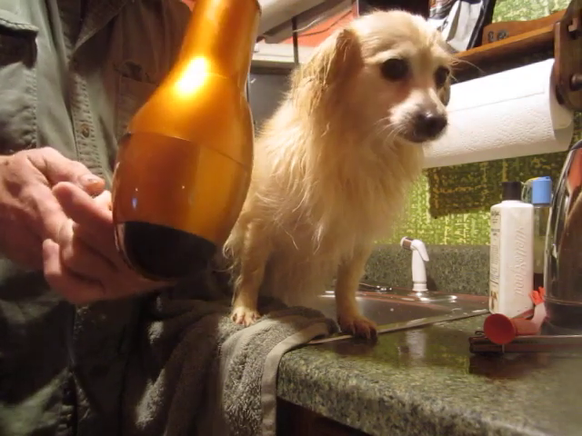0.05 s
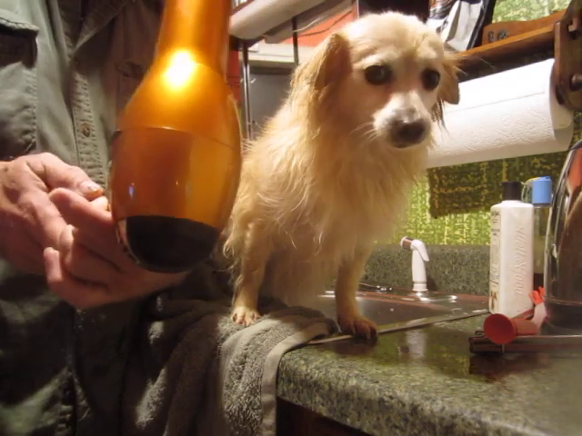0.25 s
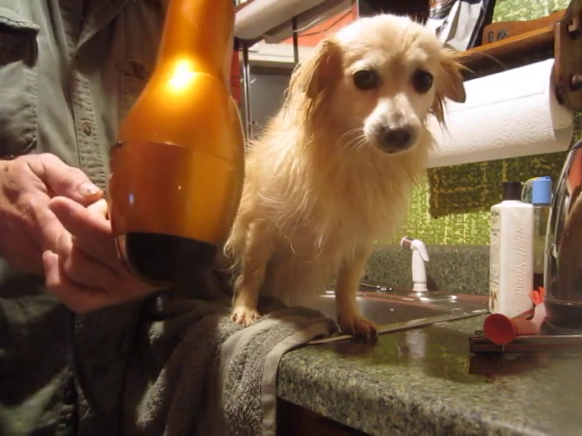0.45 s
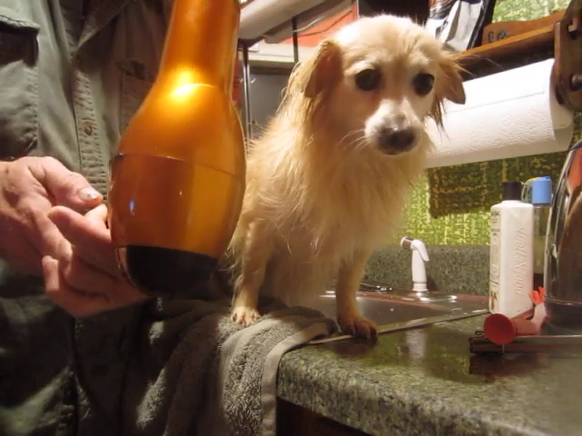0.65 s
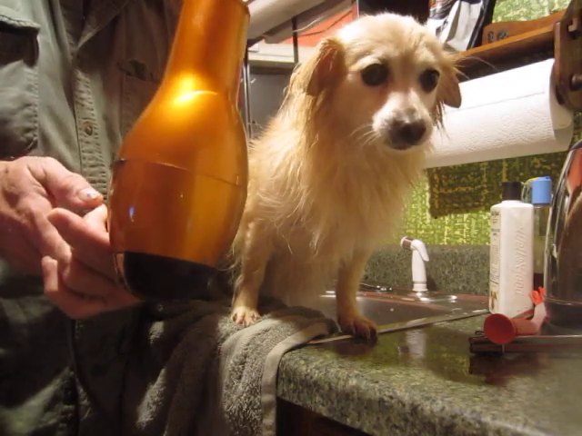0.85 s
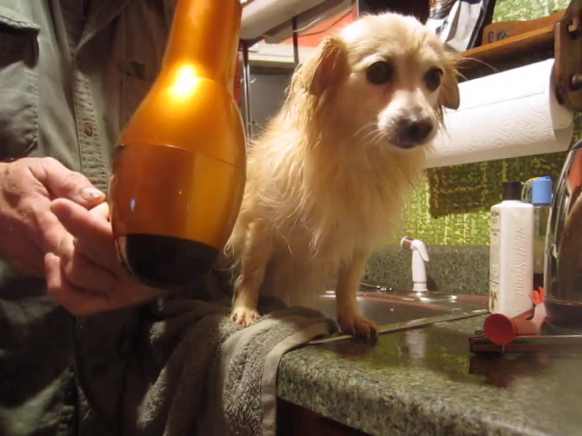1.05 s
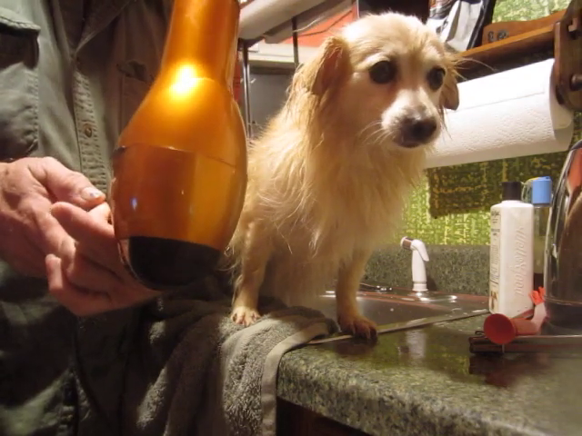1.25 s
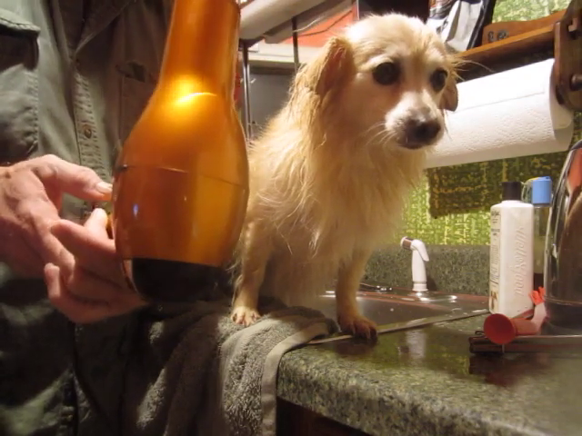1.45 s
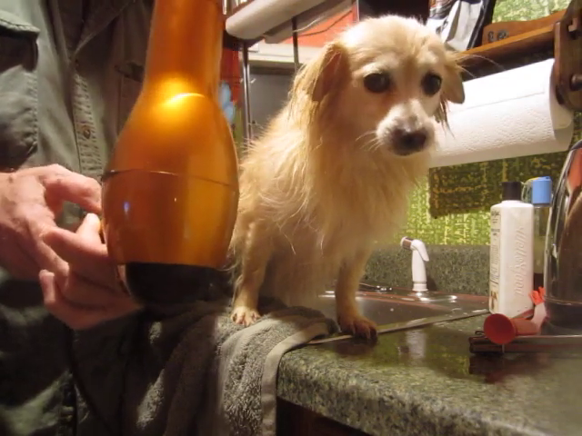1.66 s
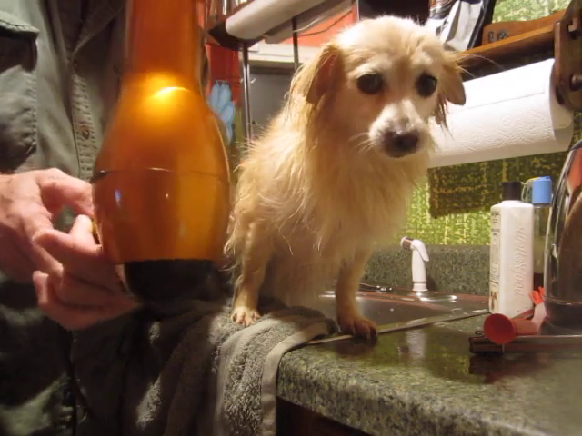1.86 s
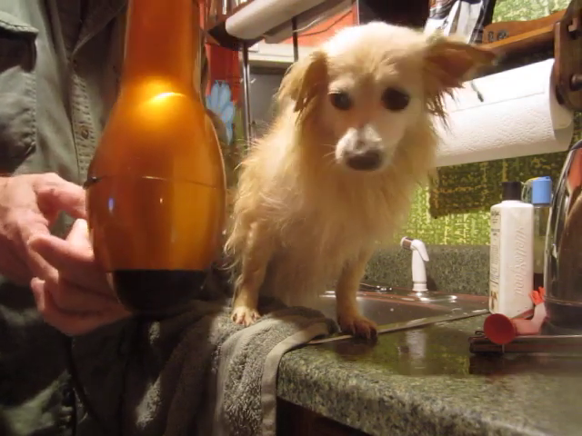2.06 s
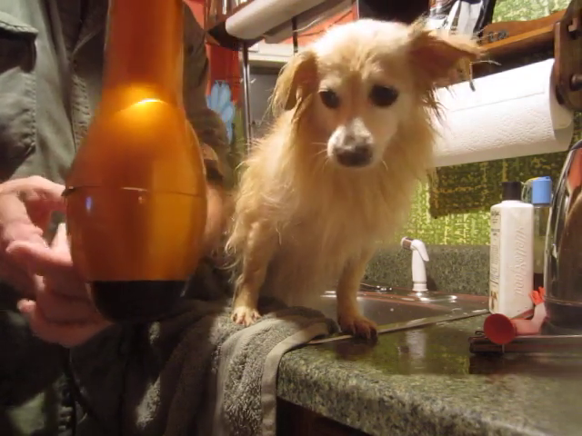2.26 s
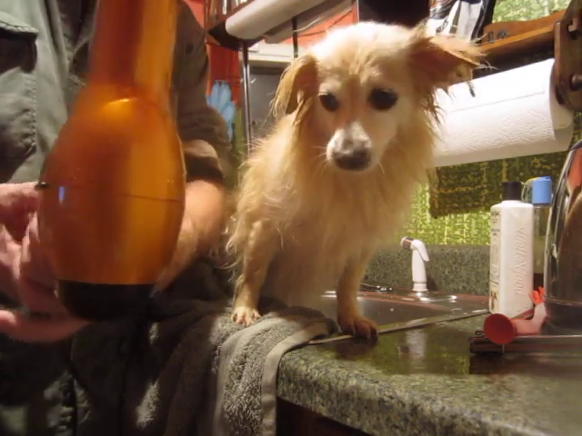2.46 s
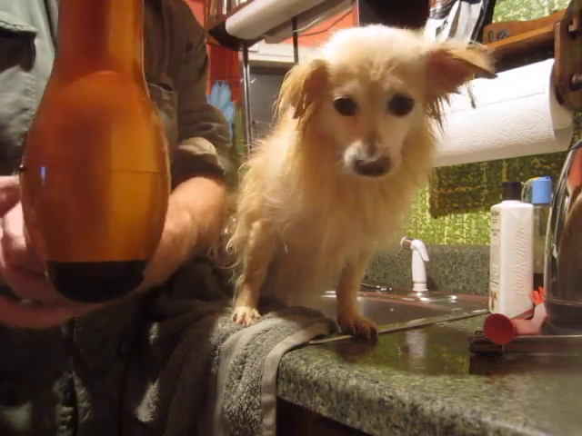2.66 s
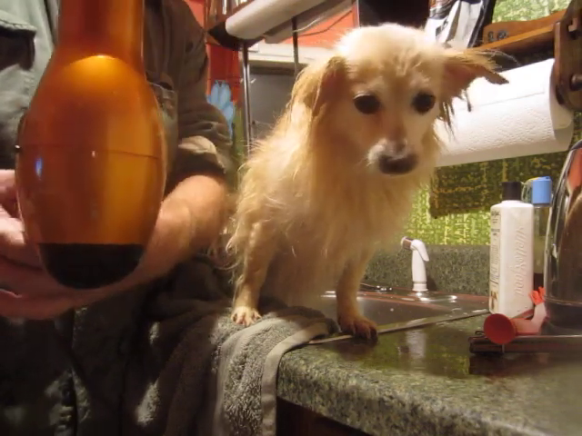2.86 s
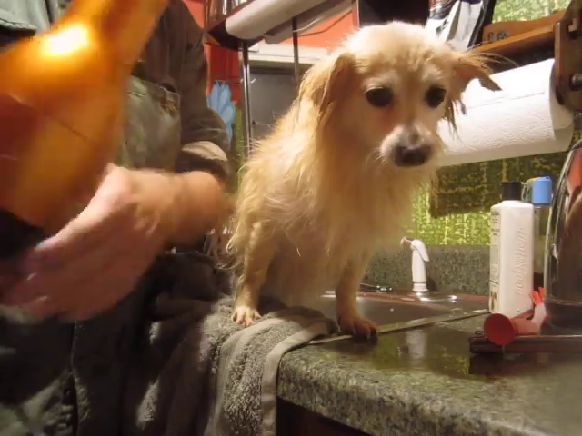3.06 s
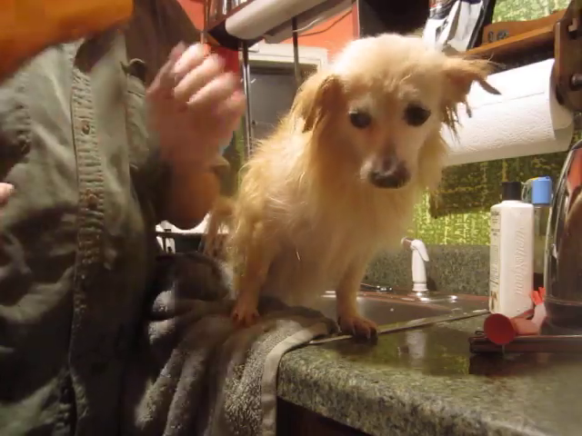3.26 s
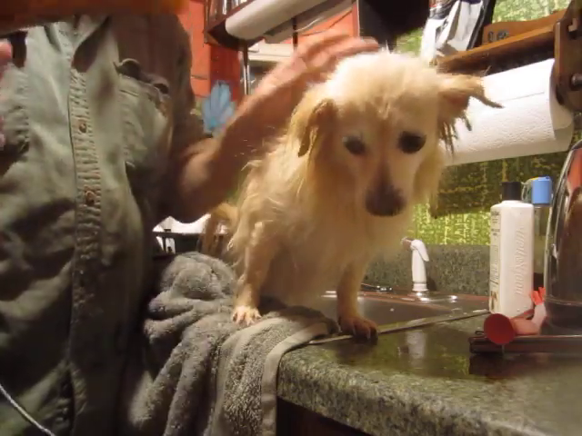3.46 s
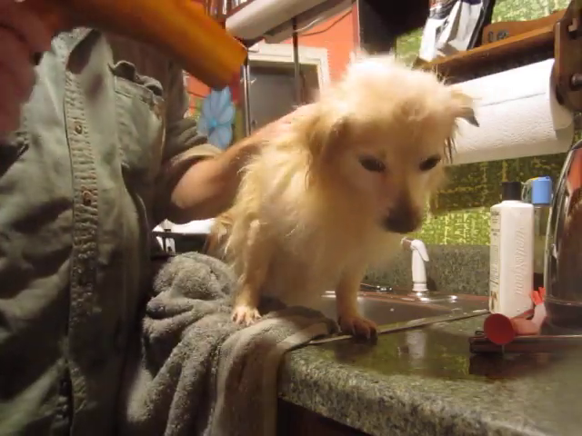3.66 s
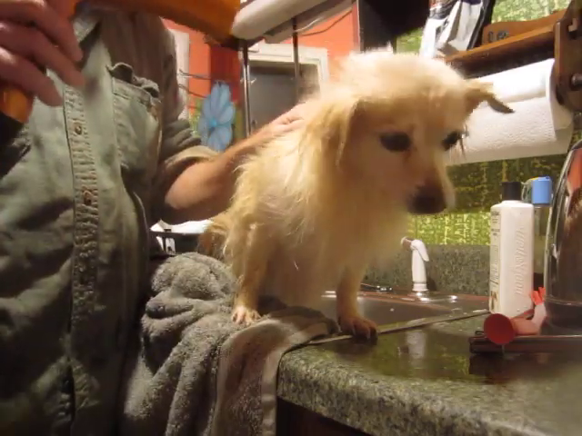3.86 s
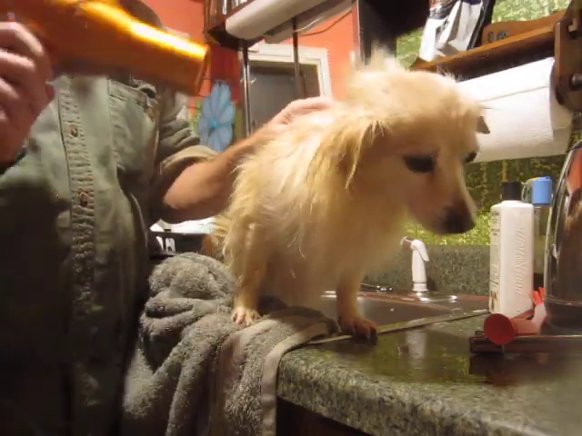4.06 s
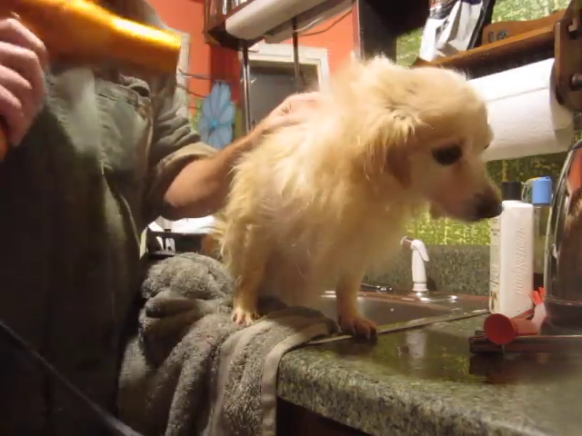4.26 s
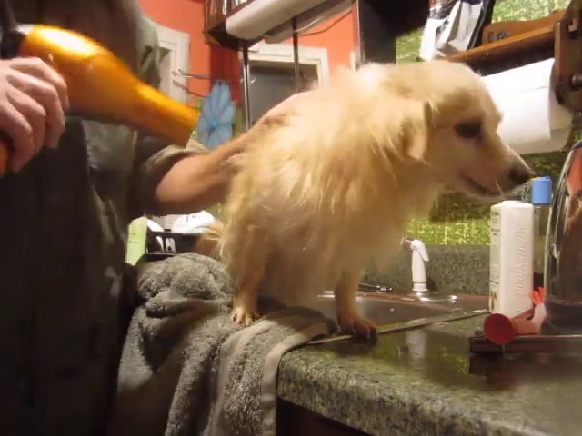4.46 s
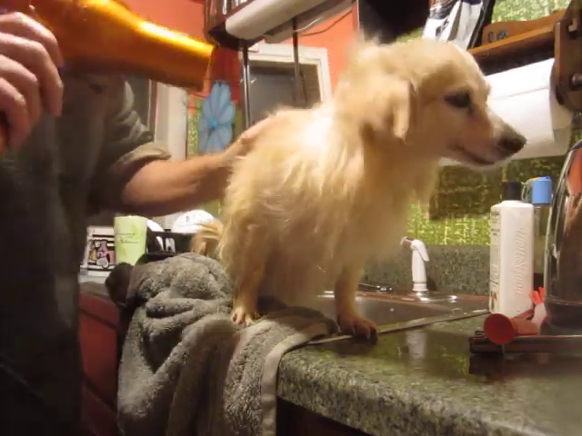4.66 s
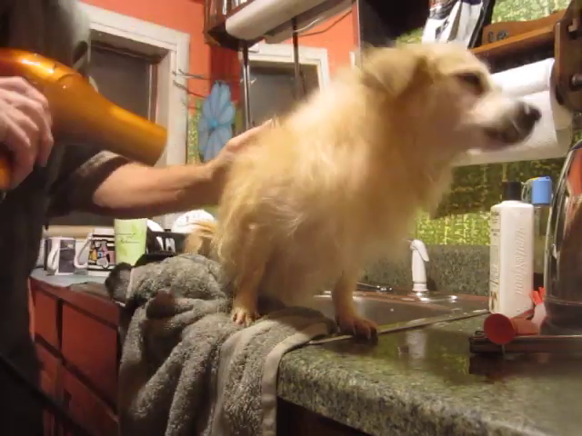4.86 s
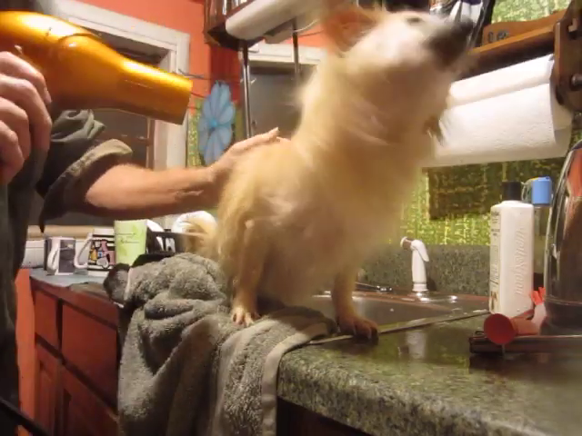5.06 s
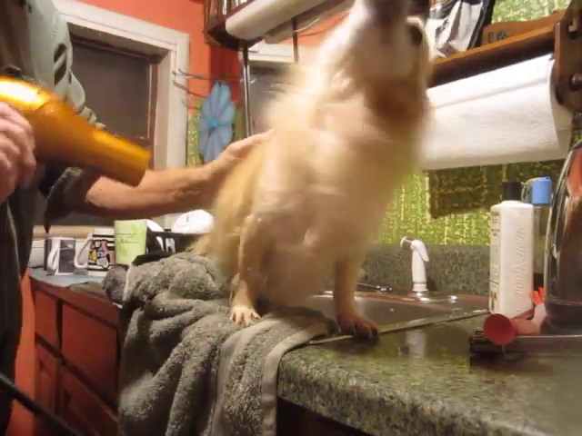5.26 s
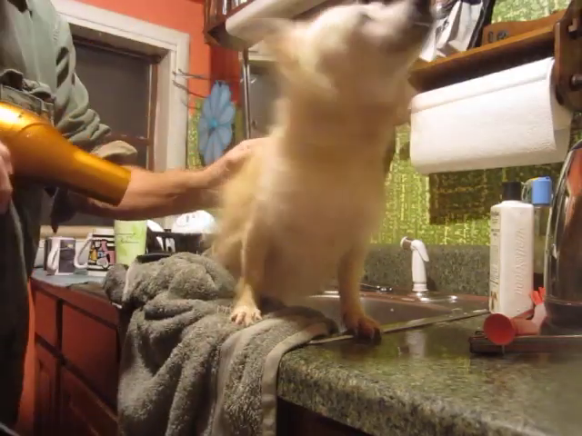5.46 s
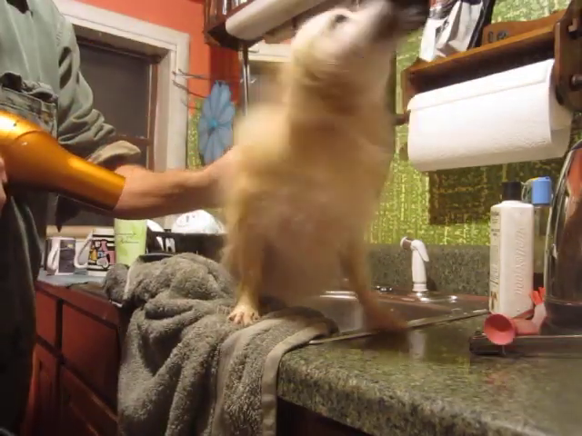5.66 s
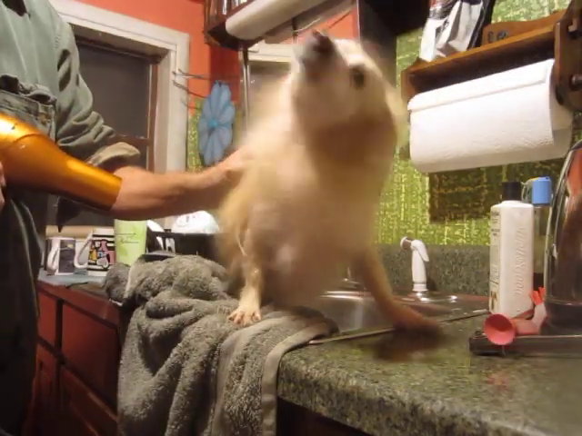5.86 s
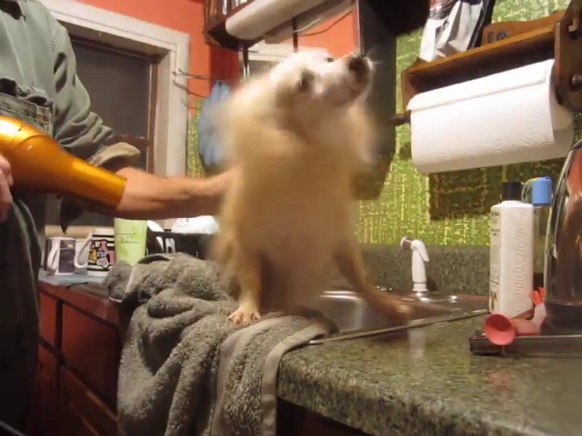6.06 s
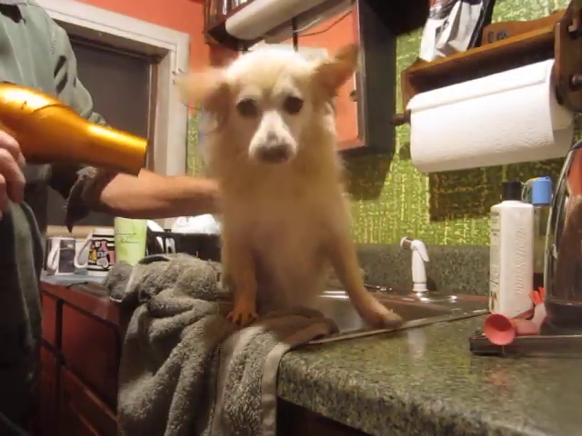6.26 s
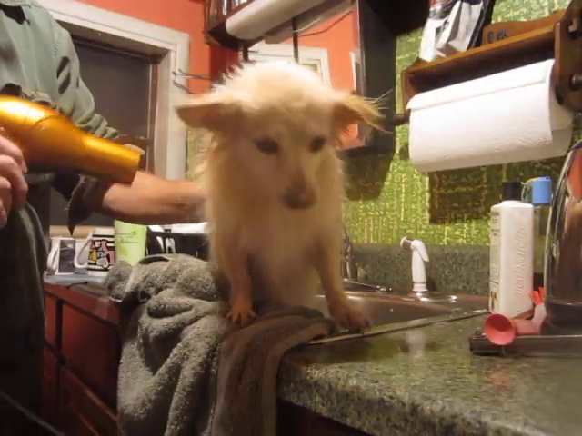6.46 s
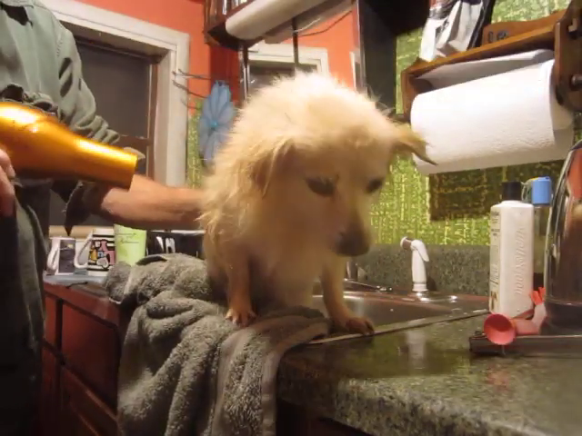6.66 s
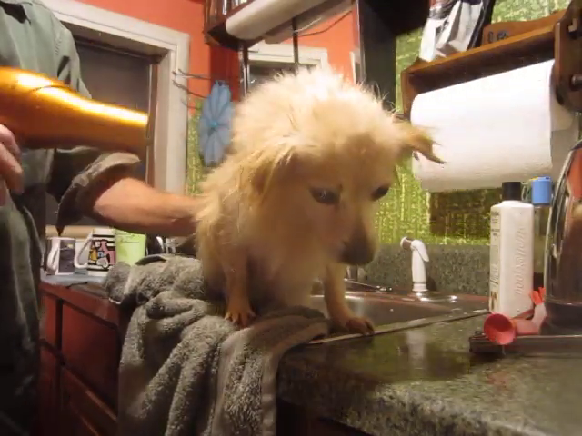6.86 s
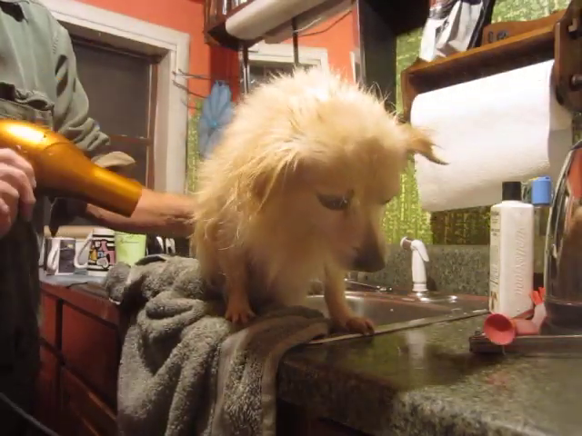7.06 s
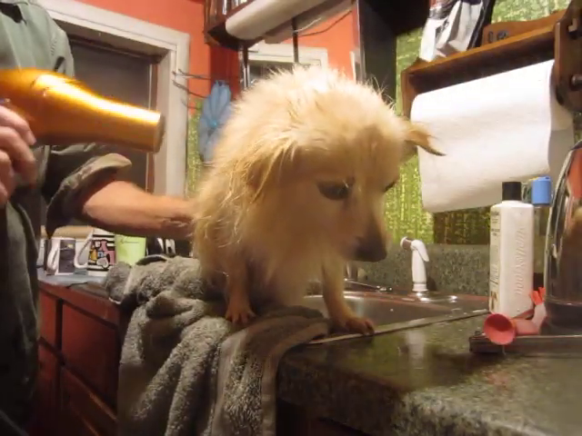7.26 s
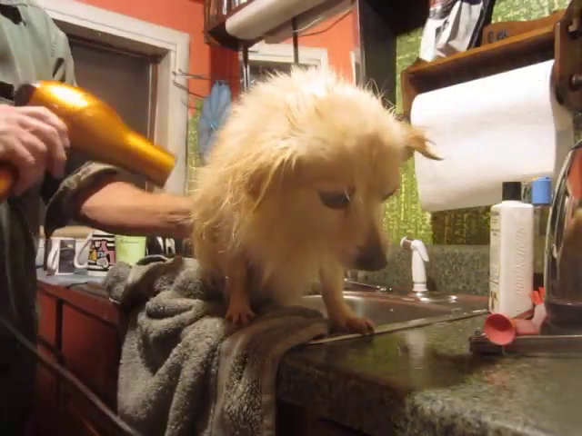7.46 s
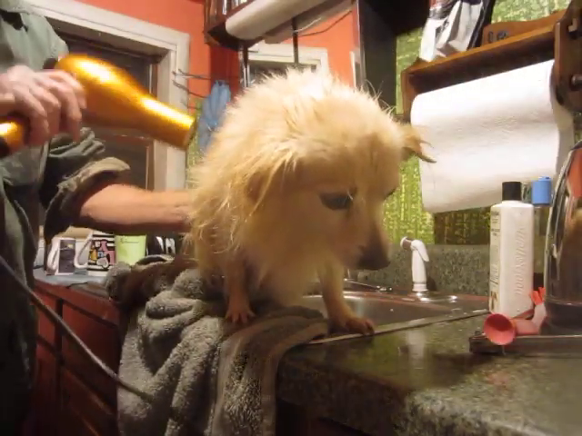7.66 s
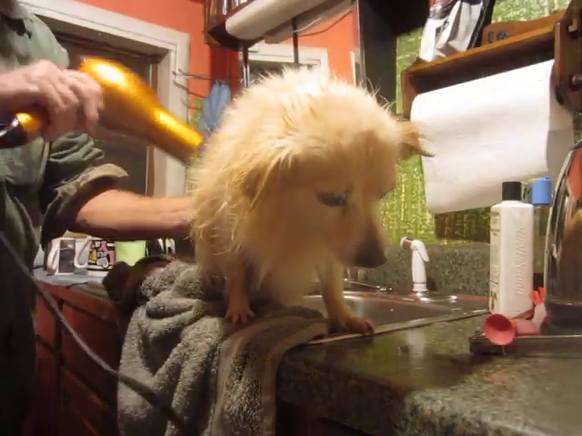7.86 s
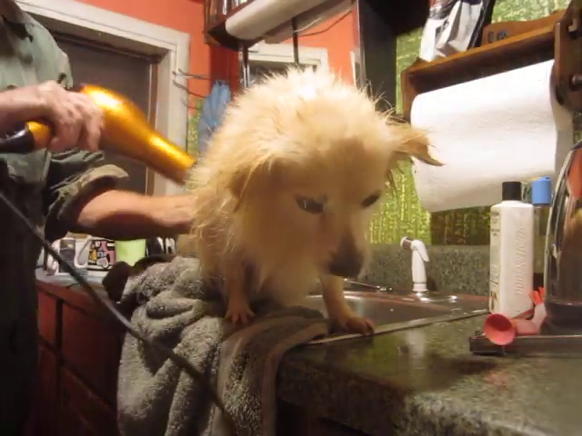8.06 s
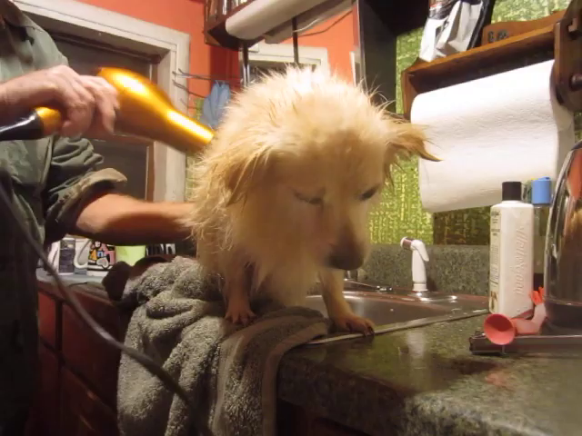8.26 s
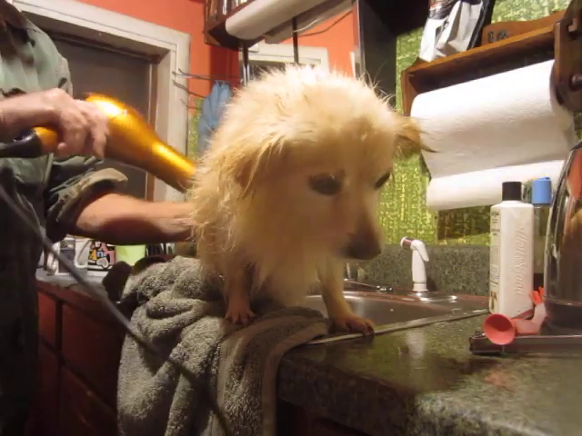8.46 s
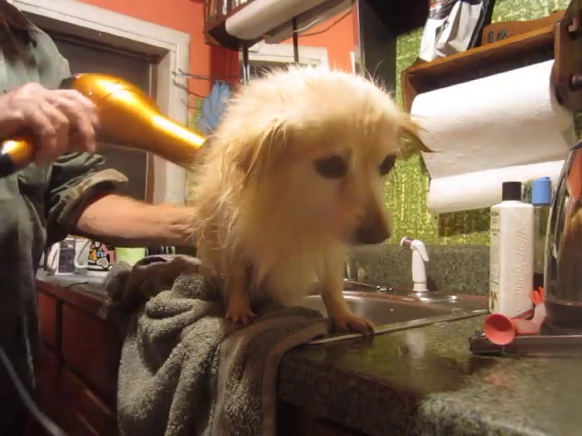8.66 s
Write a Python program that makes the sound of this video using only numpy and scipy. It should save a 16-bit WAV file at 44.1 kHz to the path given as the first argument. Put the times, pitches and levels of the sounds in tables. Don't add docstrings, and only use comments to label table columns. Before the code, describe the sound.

A small kitchen hums softly with refrigerator and lamp buzz and a few tiny metallic ticks. Just before two seconds a hard plastic switch snaps close to the microphone; a very short motor buzz and rising whoop lead into a loud hair dryer. Its broad air rush, thin high whine and hollow barrel howl shift and swell as it is waved about, running until the end while the room hum sinks underneath.

```python
import sys
import numpy as np
from scipy import signal
from scipy.fft import rfft, irfft, next_fast_len
from scipy.io import wavfile
from scipy.ndimage import uniform_filter1d

SR = 44100
rng = np.random.default_rng(int(sys.argv[2]) if len(sys.argv) > 2 else 0)


def unload_audio(sound):
    columns = np.transpose(np.atleast_2d(sound))
    steps = np.round(np.clip(columns, -1, 1) * 32767)
    wavfile.write(sys.argv[1], SR, steps.astype(np.int16))


def nominal_scale(level):
    x = np.asarray(level, float) / 20
    return 10 ** x


N = 384507
FULL_HZ = 290.6

# (frequency [Hz], density [dB per Hz])
JET_SPECTRUM = [(71, -56), (120, -23.5), (230, -14), (283, -11.5), (361, -14), (434, -8), (565, -5),
                (980, -1.5), (1740, -9), (3130, -10), (4910, -16), (6530, -18), (10900, -21.5),
                (13300, -26), (15700, -32)]
# (time [s], gain [dB])
ROOM_GAIN = [(0, 1), (1.98, 1), (2.1, -5.5), (2.7, -15.5), (3.45, -9.5), (3.6, -8), (5, -9), (6.2, -8),
             (7.5, -8), (8.72, -5.5)]
# (time [s], rise [dB], half length [s])
JET_GUSTS = [(2.6, 1, 0.24), (3.75, 1, 0.33), (4.452, 2, 0.13), (4.947, 7.5, 0.12), (5.29, 8, 0.046),
             (5.951, 4, .2), (5.5, 1, .1), (6.62, 9, 0.12), (6.903, -2, .05), (7.167, 9.5, 0.092),
             (7.899, 1, 0.21), (8.502, 2.5, 0.18)]


def unit(x):
    return x / np.sqrt(np.mean(x ** 2) + 1e-20)


def along(points, hz):
    f, v = np.transpose(points)
    return np.interp(np.log(hz + 1), np.log(f + 1), v)


def curves(rows):
    s, *cols = np.transpose(rows)
    return [np.interp(np.arange(N) / SR, s, c) for c in cols]


def swells(rows):
    out = np.zeros(N + SR)
    for s, height, half in rows:
        n = round(2 * half * SR)
        out[round((s - half) * SR):][:n] += height * np.hanning(n)
    return out[:N]


def wobble(rate, depth_db=None):
    knots = rng.standard_normal(int(N * rate / SR) + 4)
    if depth_db is not None:
        knots = nominal_scale(depth_db * knots)
    return np.interp(np.arange(N) * (rate / SR), np.arange(len(knots)), knots)


def filtered(x, response):
    m = next_fast_len(len(x) + 8192)
    return irfft(rfft(x, m) * response(np.fft.rfftfreq(m, 1 / SR)), m)[:len(x)]


def resonance(f, hz, width_hz):
    return 1j * f * width_hz / (hz * hz - f * f + 1j * f * width_hz)


def tone(hz, flutter_db, rate, blur):
    turns = np.cumsum(np.broadcast_to(hz, N)) / SR + rng.random()
    return unit(wobble(rate, flutter_db) * np.sin(2 * np.pi * turns + blur * wobble(rate)))


def narrow(hz, width_hz):
    slow = [filtered(rng.standard_normal(len(hz)), lambda f: 1 / (1 + 1j * f / width_hz) ** 2) for _ in "ab"]
    phase = 2 * np.pi * np.cumsum(hz) / SR
    return unit(slow[0] * np.cos(phase) + slow[1] * np.sin(phase))


def patchy(depth_db, size, count):
    z = signal.stft(rng.standard_normal(N + size), nperseg=size)[2]
    field = uniform_filter1d(rng.standard_normal(z.shape), size=3, axis=0)
    field = uniform_filter1d(field, size=count, axis=1)
    return signal.istft(z * nominal_scale(depth_db * unit(field)), nperseg=size)[1][:N]


def shaft():
    # (time [s], loss [turns per s], half length [s])
    sags = [(4.33, 1.2, .2), (4.9, 1.2, .4), (6.5, .7, .4), (7.0, .8, .2), (7.6, .7, .2)]
    start_s, spin_up_s = 1.85, 0.13
    creep_hz, creep_s = 6.2, 1.9
    t = np.maximum(np.arange(N) / SR - start_s, 0)
    warming = FULL_HZ - creep_hz * np.exp(-t / creep_s)
    return warming * (1 - np.exp(-t / spin_up_s)) - swells(sags)


def running():
    return np.clip((np.arange(N) / SR - 1.868) / 0.027, 0, 1)


def kitchen():
    # (frequency [Hz], level [dB])
    hum = [(59.2, -55), (107.7, -53), (215.3, -58.5), (279.9, -52.5), (387.6, -59), (538.3, -62.5),
           (699.8, -68), (818.3, -68), (1588, -67.5), (2686, -75), (2745, -76), (3230, -73), (3472, -63.5),
           (3655, -61), (3941, -92), (4269, -69), (4974, -74), (5959, -68.5), (6019, -75), (6368, -76),
           (7068, -69.5), (8032, -65), (8166, -83), (9200, -78), (10487, -86), (11897, -87)]
    # (frequency [Hz], width [Hz], level [dB])
    rings = [(195, 49, -55.5), (354, 80, -56.5), (455, 50, -61), (3455, 110, -60), (3660, 84, -60),
             (2110, 65, -74), (4700, 200, -72), (5920, 240, -67), (8070, 250, -62), (10400, 300, -78),
             (13100, 40, -90), (13500, 60, -90), (14900, 150, -88), (15300, 50, -92)]
    # (frequency [Hz], density [dB per Hz])
    room = [(15, -36), (25, -10), (107, -2.5), (156, -16), (275, -8.5), (700, -10), (1430, -20.5),
            (2440, -26.5), (3300, -22.5), (4500, -22), (5490, -29.5), (7500, -27), (8910, -33),
            (15700, -47)]
    # (time [s], frequency [Hz], level [dB], 60 dB decay [s])
    ticks = [(.16, 11900, -64, .5), (.2, 11500, -66, .02), (.32, 11000, -62, .02), (.325, 12300, -66, .03),
             (.68, 11000, -58, .012), (.682, 12400, -60, .012)]
    lines = sum(nominal_scale(db + 1) * tone(hz, flutter_db=1.0 + hz / 4000, rate=6 + hz / 250, blur=.15 + hz / 7000)
                for hz, db in hum)

    def skirt_power(f):
        return sum(nominal_scale(2 * db) * SR / w * abs(resonance(f, c, w)) ** 4 for c, w, db in rings)

    skirts = 0.95 * filtered(rng.standard_normal(N), lambda f: np.sqrt(skirt_power(f)))
    hush = filtered(patchy(depth_db=2.0, size=2048, count=12), lambda f: nominal_scale(along(room, f)))
    hush = nominal_scale(-49.5) * unit(hush)
    t = np.arange(SR // 4) / SR
    for s, hz, db, t60 in ticks:
        hush[round(s * SR):][:len(t)] += nominal_scale(db - 60 * t / t60) * np.sin(2 * np.pi * hz * t)
    return lines + skirts + hush


def switch():
    # (time [s], peak [dB])
    snaps = [(1.8532, -19), (1.8524, -0.5), (1.876, -8), (1.878, 1), (1.8824, -13), (1.89, -15)]
    # (frequency [Hz], level [dB], 60 dB decay [s])
    handle = [(1620, -7, .006), (2100, -14, .006), (2930, 2, 0.0054), (5500, -8, .006), (8000, 1, 0.0053),
              (10500, -14, .005)]
    out, t = np.zeros(N), np.arange(SR // 8) / SR
    for s, db in snaps:
        ring = sum(nominal_scale(level + rng.normal(0, 1.9) - 60 * t / t60) * np.sin(2 * np.pi * hz * t)
                   for hz, level, t60 in handle)
        crack = .6 * nominal_scale(-60 * t / .008) * rng.uniform(-1.7, 1.7, len(t))
        echo = 0.24 * nominal_scale(-60 * t / 0.16) * rng.standard_normal(len(t))
        onset = 1 - np.exp(-t * 2500)
        out[round(s * SR):][:len(t)] += nominal_scale(db - 5.5) * (ring + crack + echo) * onset
    return filtered(out, lambda f: (1j * f / (900 + 1j * f)) ** 2 / (1 + 1j * f / 9000) ** 3)


def buzz():
    # (time [s], level [dB])
    torque = [(1.868, -40), (1.872, -16), (1.9, -14.5), (1.95, -12.5), (1.99, -19), (2.04, -42)]
    # (frequency [Hz], width [Hz], level [dB])
    shell = [(604, 170, -0.5), (1090, 860, -6.5), (2200, 920, -4)]
    mains_hz, count, length = 59.6, 22, 170
    times = 1.8698 + np.arange(count) / (2 * mains_hz)
    push = np.hanning(length)
    shape = rng.standard_normal(length)

    def casing(f):
        modes = sum((-1) ** k * nominal_scale(db) * resonance(f, c, w) for k, (c, w, db) in enumerate(shell))
        return modes / (1 + 1j * f / 2600) ** 3

    jolts = np.zeros(N)
    for s, change in zip(times, rng.standard_normal((count, length))):
        kick = np.pad((shape + 1.35 * change) * push, (0, 630))
        jolts[round(s * SR):][:800] += unit(filtered(kick, casing))
    return nominal_scale(curves(torque)[0] - 14.5) * jolts


def whine():
    # (time [s], blade tone level [dB])
    intake = [(1.93, -45), (2.02, -33), (2.5, -30.5), (2.95, -27), (3.15, -30.5), (3.35, -38), (3.6, -36),
              (4.05, -54), (4.45, -39), (4.75, -47), (5.18, -30.5), (5.3, -47), (7.3, -48), (7.7, -34.5),
              (7.9, -46), (8.3, -31), (8.45, -46), (8.72, -50)]
    # (time [s], order [per turn], level [dB], half length [s])
    glints = [(2.75, 10, -40, 0.65), (3.87, 10, -37, 0.11), (4.252, 10, -43, .2), (4.696, 10, -40, .18),
              (5.151, 10, -40, .15), (7.248, 10, -41, .15), (7.8, 10, -37.5, 0.16), (8.3, 10, -41, .2),
              (2.56, 18, -41, 0.16), (3.45, 18, -44, .15), (4.2, 18, -45, .2), (4.8, 18, -46, .15),
              (5.851, 18, -48, .3), (6.363, 18, -41, 0.14), (7.2, 18, -46, 0.27), (8.2, 18, -45, 0.49),
              (8.6, 9, -32.5, .1), (5.003, 9, -40, .15), (5.901, 9, -47, 0.23), (6.421, 9, -43, .18),
              (6.951, 9, -41, .15), (3.4, 1, -52.5, 1), (2.3, 18, -44, .15), (7.699, 18, -47, .2)]
    shaft_hz = shaft()
    imbalance = nominal_scale(-47.5 + 1.1 * wobble(6)) * (shaft_hz / FULL_HZ) ** 3
    steady = {1: imbalance, 9: nominal_scale(curves(intake)[0]), 10: nominal_scale(-53), 18: nominal_scale(-54)}
    out = np.zeros(N)
    for k, gain in steady.items():
        flashes = swells([(s, nominal_scale(db), half) for s, order, db, half in glints if round(order) == k])
        out += (gain + flashes) * tone(k * shaft_hz, flutter_db=1.5, rate=16, blur=0.32)
    return out


def pockets():
    # (time [s], frequency [Hz], level [dB], half length [s])
    passing = [(2.0, 421, -34, 0.092), (2.18, 560, -25.5, .12), (2.2, 1350, -46, 0.23),
               (2.55, 954, -32, .15), (3.4, 564, -47, 0.18), (3.45, 1151, -32, 0.15),
               (3.78, 723, -27.5, 0.18), (4.4, 627, -27.5, 0.17), (4.5, 1180, -31, 0.26),
               (4.9, 1652, -31, 0.11), (5.1, 452.7, -39, 0.32), (5.5, 703, -50, 0.31), (5.7, 1187, -31, .4),
               (6.3, 493.6, -37, 0.53), (7.6, 1142, -31, .15), (7.6, 2802, -34, 0.29), (7.9, 424, -35, .15),
               (8.3, 2190, -31, 0.3), (8.4, 3876, -36, .3)]
    out = np.zeros(N + SR)
    for s, hz, db, half in passing:
        n = round(2 * half * SR)
        noise = narrow(np.full(n, hz), width_hz=25 + hz / 100)
        out[round((s - half) * SR):][:n] += nominal_scale(db - 3.5) * np.hanning(n) * noise
    return out[:N]


def howl():
    # (time [s], frequency [Hz], level [dB])
    whoop = [(1.92, 500, -41), (1.955, 525.2, -24), (1.99, 572.2, -20), (2.025, 705, -20.5),
             (2.05, 624, -23), (2.09, 760, -29)]
    # (from [s], to [s], from [Hz], to [Hz], level [dB])
    poses = [(2.201, 2.798, 830, 838, -35.5), (3.348, 4.897, 921, 992, -32),
             (5.292, 7.366, 892.4, 896, -31), (7.62, 8.714, 979, 991.5, -30.5)]
    turn_s, turn_db = 0.0997, 8
    held = []
    for a, b, lo, hi, db in poses:
        held += [(a - turn_s, lo, db - turn_db), (a, lo, db)]
        held += [(b, hi, db), (b + turn_s, hi, db - turn_db)]
    hz, db = curves(whoop + held)
    core = tone(hz, flutter_db=3.0, rate=30, blur=0.94)
    return nominal_scale(db + swells(JET_GUSTS)) * unit(core + 1.02 * narrow(hz, width_hz=43))


def air():
    # (frequency [Hz], width [Hz], lift [dB])
    nozzle = [(3280, 380, 1.5), (6500, 830, 2)]
    edges_hz = (120, 400, 1500, 5000, 8500, 15900)
    # (time [s], nearness [dB], aim [1 at a surface, -1 into open air])
    hold = [(1.87, 5.5, 0), (2.1, 3.5, .5), (2.35, 1.8, 0.25), (2.8, 0, 0.13), (3.2, 1, 0.48),
            (3.7, 1.1, -0.58), (4.0, -.2, -1.11), (4.2, -0.5, -1), (4.42, -0.5, 0.64), (4.8, -0.3, 0.35),
            (5.15, 0.1, -0.56), (5.4, -0.4, 0.92), (6.0, -1, 1), (6.4, -0.4, -0.36), (7.0, 0, -0.1),
            (7.5, -0.5, -0.35), (7.8, -0.3, -1.16), (8.72, 0, -0.91)]
    # (level [dB], speed [dB per dB], nearness [dB per dB], aim [dB per unit], gust [dB per dB])
    laws = [(-38.5, 0.5, -1.5, 1.5, 0), (-26, 2.3, 1.1, 1.8, 0.27), (-28, 1, 1, -.5, -0.11),
            (-34, 1, .7, -1, -0.17), (-35.5, 1.9, 1.57, 0.2, -0.19)]
    near = patchy(depth_db=1.2, size=256, count=40)
    echoed = patchy(depth_db=3, size=4096, count=9)

    def wet(f):
        return 1 / (1.145 + (f / 4000) ** 2)

    def above(f, hz):
        return 1 / (1 + (hz / (f + 1)) ** 8)

    flow = filtered(unit(near), lambda f: nominal_scale(along(JET_SPECTRUM, f)) * np.sqrt(1 - wet(f)))
    flow += filtered(unit(echoed), lambda f: nominal_scale(along(JET_SPECTRUM, f)) * np.sqrt(wet(f)))
    flow = filtered(flow, lambda f: nominal_scale(sum(db * abs(resonance(f, c, w)) ** 2 for c, w, db in nozzle)))
    flow *= nominal_scale(0.067 * wobble(7.2) + 0.38 * wobble(30))
    near_db, aim = curves(hold)
    speed_db = 20 * np.log10(np.maximum(shaft() / FULL_HZ, .1))
    drives = np.array([np.ones(N), speed_db, near_db, aim, swells(JET_GUSTS)])
    layers = []
    for law, lo, hi in zip(laws, edges_hz, edges_hz[1:]):
        band = filtered(flow, lambda f: above(f, lo) - above(f, hi))
        layers.append(nominal_scale(np.dot(law, drives)) * unit(band))
    return nominal_scale(curves(ROOM_GAIN)[0]) * layers[0] + sum(layers[1:])


def scene():
    room = nominal_scale(curves(ROOM_GAIN)[0]) * kitchen()
    dryer = running() * (air() + howl() + pockets() + whine())
    mono = room + switch() + buzz() + dryer
    return np.array([mono, mono])


def side_flecks():
    moments = [2.027, 2.191, 2.701, 2.772, 3.004, 3.216, 3.306, 3.325, 3.421, 3.611, 3.956, 4.074, 4.235,
               4.696, 4.768, 4.978, 6.184, 6.215, 6.324, 6.49, 7.768, 8.202, 8.227, 8.277, 8.323, 8.415]
    frame, grid = 1024, 389
    lowest_hz, highest_hz = (4700, 9800), (9800, 15000)
    level_db, wide_hz = -22, 1200
    side, n = np.zeros(N), np.arange(2 * frame)
    fade = np.sin(np.pi * (n + .5) / (2 * frame))
    centres = rng.uniform(lowest_hz, highest_hz, (len(moments), 2))
    for s, hz in zip(np.repeat(moments, 2), centres.ravel()):
        db = level_db + along(JET_SPECTRUM, hz)
        borders_hz = hz + np.array([-.5, .5]) * wide_hz
        bins = np.arange(*np.round(borders_hz * 2 * frame / SR))
        waves = np.cos(np.pi / frame * np.outer(n + .5 + frame / 2, bins + .5))
        noise = unit(waves @ rng.standard_normal(len(bins)))
        start = grid + frame * (round((s * SR - grid) / frame) - 1)
        side[start:][:2 * frame] += nominal_scale(db) * fade * noise
    return side


def low_pass(x):
    return signal.sosfilt(signal.butter(12, 16240, fs=SR, output="sos"), x)


def record(dry):
    side = side_flecks()
    mono = filtered(dry[0], lambda f: f < 15730)
    return low_pass(np.array([mono + side, mono - side]))


dry = scene()
out = record(dry)
unload_audio(out)
```